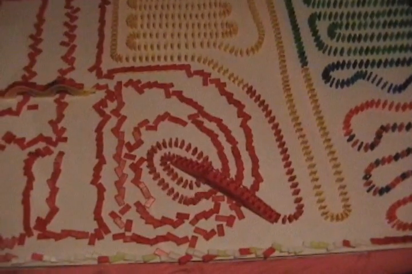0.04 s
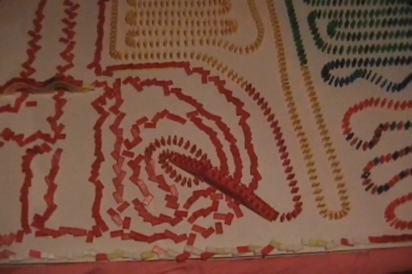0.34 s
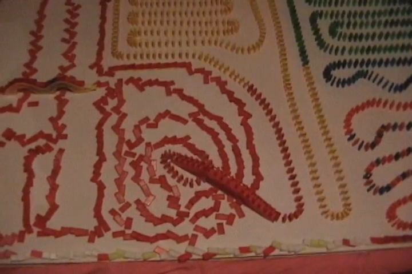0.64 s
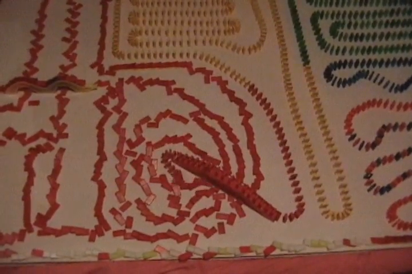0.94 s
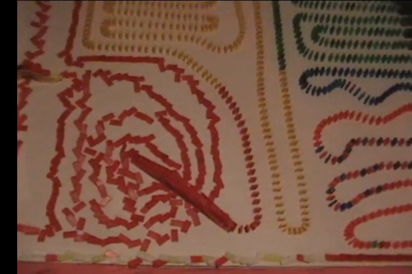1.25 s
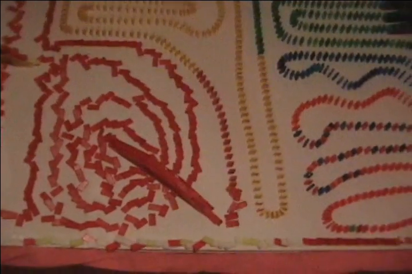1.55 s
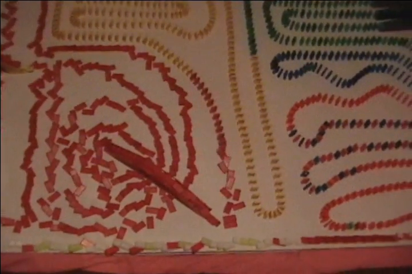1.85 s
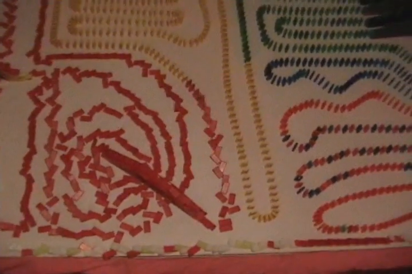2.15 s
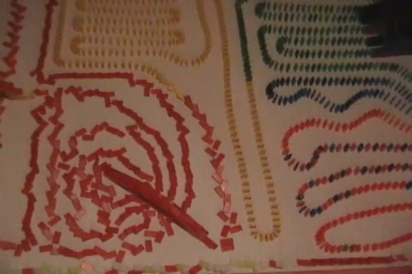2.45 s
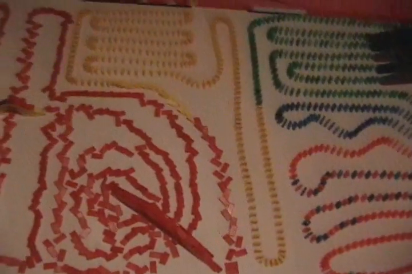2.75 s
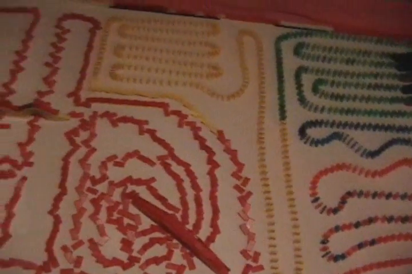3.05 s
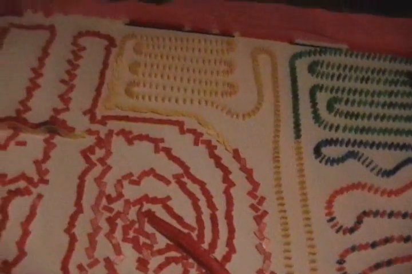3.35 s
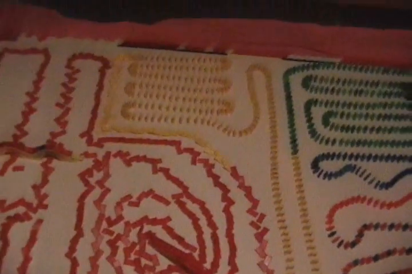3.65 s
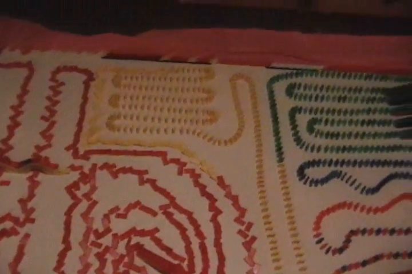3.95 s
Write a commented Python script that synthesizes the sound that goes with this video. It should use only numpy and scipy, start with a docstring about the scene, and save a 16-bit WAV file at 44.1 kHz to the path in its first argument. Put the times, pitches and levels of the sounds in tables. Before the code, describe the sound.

A chain of falling dominoes clicks and rattles without a break, heard from just above the board indoors. Partway through comes one short metallic ring, and afterwards the tiles sound a little duller and softer.

```python
"""Chains of small hard dominoes topple across a board, the microphone just above them in a room.
Each tile hits the next, chatters and rings briefly; lighter contacts of settling tiles fill the gaps
and the board rumbles. Once something metallic is struck and rings on; later the chain runs into
lower-pitched tiles and gets quieter. The image is nearly mono, with low room noise and a faint hum."""
import sys
import numpy as np
from scipy import signal
from scipy.fft import rfft, irfft, next_fast_len
from scipy.io import wavfile

SR = 44100
rng = np.random.default_rng(int(sys.argv[2]) if len(sys.argv) > 2 else 0)


def wav_out(sig):
    """Save sig, one row per channel (or a flat mono array), as 16-bit PCM at SR to the path in sys.argv[1]."""
    wavfile.write(sys.argv[1], SR, np.round(np.clip(np.atleast_2d(sig).T, -1, 1) * 32767).astype(np.int16))


N = 176400

# Clear clacks at the front of the chain. Each row: start in seconds, relative level in dB,
# then trims in dB for the knock, the main ring and the overtones.
CLACKS = [(.0044,-13.5,-21,-5,-12.5),(.0433,-26,-25,-1,-19),(.0717,-7,-34,-17,-16),(.0974,-10,-33,-24,-15),(.1231,-20,-30,1,-5.5),(.1514,-6.5,-37,-31,-20),(.1956,-5.5,-24,-15,-22),
          (.2205,-8.5,-25,-7.5,-13.5),(.2553,-10,-26,-8,-14),(.281,-6.5,-28,-13,-21),(.3096,-6,-32,-16,-16),(.337,-11,-31,-12,-22),(.346,-3.5,-19,-25,-19),(.377,-12.5,-30,-1,-16),
          (.395,-8.5,-37,-11,-24),(.4291,-7.5,-23,-15,-17.5),(.46,-7.5,-20,-12,-19),(.4944,-9.5,-22,-10.5,-16),(.5426,-11.5,-26,-10.5,-24),(.5796,-15,-33,-22,-5.5),
          (.6415,-10.5,-13.5,-36,-10.5),(.6544,-8.5,-19,-21,-35),(.682,-9,-11,-8.5,-17),(.71,-11.5,-30,-10,-18),(.7366,-19,-23,-1.5,-22),(.825,-14,-13,-6.5,-20),(.835,-15,-0.5,-16,-20),
          (.8595,-5,-26,-12.5,-22.5),(.8811,-19,-17,-5,-17),(.9149,-10.5,-20,-22,-28),(.9593,-10,-11,-15,-17),(.9935,-8,-10.5,-11,-17),(1.027,-16.5,-2,-8,-15),(1.0579,-12.5,-4.5,-10,-12.5),
          (1.1015,-14,-8,-12,-19),(1.1216,-16.5,0,-18,-10),(1.1942,-17,-6,-8,-6.5),(1.206,-12.5,-1.5,-6,-22),(1.264,-13.5,-6.5,-29,-16),(1.282,-8,-11,-34,-17),(1.3088,-11,-7.5,-12,-23),
          (1.3188,-14,-11,-21,-17),(1.462,-9,-6.5,-13,-31),(1.545,-12,-18,-12,-20),(1.5518,-6.5,-17,-10.5,-24),(1.5885,-13,-11,-8,-14),(1.5986,-15.5,-7,-7,-18),(1.6144,-8.5,-12,-10.5,-13),
          (1.6625,-20,-0.5,-9,-25),(1.6761,-17,-3.5,-2.5,-13),(1.703,-12.5,-22,-16,-29),(1.741,-8.5,-30,-21,-18.5),(1.7883,-11,-12.5,-11,-8.5),(1.8266,-9.5,-26,-8,-22),(1.8649,-10,-20,-11,-14),
          (1.8992,-9,-30,-28,-18),(1.9356,-7.5,-16.5,-30,-14.5),(1.9698,-12.5,-27,-10,-18),(2.0059,-13,-33,-5.5,-12.5),(2.047,-9,-31,-11,-12),(2.091,-9,-13.5,-14,-15.5),(2.1265,-13,-27,-5,-10.5),
          (2.1615,-13,-27,-10,-17),(2.1929,-12,-9,-27,-14.5),(2.2281,-8,-13,-14,-18.5),(2.2572,-9.5,-11.5,-5.5,-17),(2.319,-13,-23,-30,-28),(2.348,-13.5,-23,-26,-8.5),(2.4158,-15.5,-16,-15,-14),
          (2.4469,-13.5,-14,-30,-22),(2.4792,-9,-19,-29,-20),(2.518,-18,-24,-33,-11),(2.541,-14,-25,-24,-27),(2.7082,-21.5,-2.5,-26,-20),(2.8555,-18.5,-29,-8.5,-10),(2.9426,-11,-17,-27,-16),
          (3.066,-8.5,-15,-21,-15.5),(3.0874,-16,-11,-16,-21),(3.1308,-19.5,-26,-17,-11),(3.3543,-11,-7.5,-30,-28),(3.3913,-15.5,-20,-2,-29),
          (3.425,-15.5,-21,-10,-11.5),(3.462,-10.5,-13,-10.5,-19),(3.4864,-14,-24,-6,-14.5),(3.5193,-13,-25,-31,-18),(3.5405,-12.5,-29,-28,-16),(3.6338,-13.5,-32,-32,-37),(3.684,-17.5,-25,-16,-13),
          (3.6907,-17,-28,-28,-7),(3.71,-10.5,-31,-33,-24),(3.7784,-17.5,-2,-27,-28),(3.7983,-16,-8,-13,-14),(3.8871,-15,-23,-16,-20),(3.9289,-12,-27,-20,-20)]
# Modes of the two kinds of tile, the board and the metal.
# Each row: frequency in Hz, relative level in dB, seconds to fall 60 dB.
HIGH_TILE_MODES = [(1334,-9,0.064),(4600,-16,0.057),(4737,3.5,0.029),(5070,-1.5,0.17),(5230,11,0.089),(5570,-24,0.022),(6410,-32,0.037),(6940,9.5,0.069),(7520,20.5,0.078),(8960,21,0.0082),(9920,17,0.013),(10790,17,0.021),(12500,-12,0.013)]
LOW_TILE_MODES = [(4130,3,0.08),(4432,14,0.024),(4694,13,0.058),(5164,4,0.042),(6300,-4,0.013),(6780,-4,0.058),(7140,-18,0.11),(8002,18.5,0.0047),(8670,5,0.015),(9400,11,0.013),(10360,-17,0.04)]
BOARD_MODES = [(114.5,-12,0.092),(180,18.5,0.077),(198.4,-1,0.82),(241,21,0.055),(330,-9,.07)]
METAL_MODES = [(1373,-12,.2),(1567,3,.4),(1690,0,.1),(2315,-3,.2),(2449,-7,.2),(2649,-5,.12),(2735,-5,.15),(3483,-12,.22),(5753,-4,.35),(8915,11,.14),(9157,2,.14),(10300,-1,.12),(12800,-5,.2)]
# Low tiles along the chain. Each row: time in seconds, share from 0 to 1.
LOW_TILE_SHARE = [(0,0.01),(1.7,0.03),(2.27,0.2),(2.33,0.9),(3.3,0.95),(3.39,0.3),(4,0.4)]
# Spectra of the contact noises and the room noise. Each row: frequency in Hz, gain in dB.
KNOCK_SPECTRUM = [(30,-24),(100,-12),(220,0),(320,0.5),(550,-3),(830,-4),(1080,-6.5),(1350,3.5),(1900,-1.5),(2700,5),(3600,6.5),(4500,7),(7000,-7),(14000,-50)]
CRACK_SPECTRUM = [(100,-9),(2000,-7.5),(3700,-42.5),(4700,6),(6000,12.5),(8000,8),(10500,-27),(12000,-3),(14000,-1.5)]
SNAP_SPECTRUM = [(300,-13),(3000,-6),(7000,-4),(9000,9),(10500,-9),(13000,-7.5)]
RATTLE_SPECTRUM = [(200,-10),(1000,-1.5),(1500,9.5),(3000,1.5),(6000,3),(9000,11),(13000,-1)]
ROOM_SPECTRUM = [(20,-6),(45,-17),(80,3),(130,5.5),(250,1.5),(450,2),(900,-0.5),(4000,-32.5),(14000,-66)]
# Strength of the settling tiles, and of their main ring. Each row: time in seconds, relative level in dB.
SETTLING_LEVEL = [(0,-20.5),(.4,-23.5),(.6,-21.5),(.8,-25),(.9,-20),(1.05,-28.5),(1.17,-24.5),(1.22,-22.5),(1.3,-21),(1.45,-21),(1.61,-23.5),(1.65,-49),(1.73,-25),(1.8,-23),(2.22,-24),(2.31,-25.5),(2.5,-23),(2.6,-25),(2.9,-25.5),(3.0,-30),(3.08,-23.5),(3.25,-24),(3.5,-31),(3.6,-28.5),(3.72,-25),(3.85,-24),(4,-25)]
SETTLING_RING = [(.75,1.5),(1.05,-6.5),(1.45,-3),(1.6,-0.5),(2.25,-0.5),(2.6,-1.5),(3.5,-0.5)]
# Hum in the room. Each row: frequency in Hz, level in dB.
HUM_TONES = [(118,-64),(198,-59)]
# Tiles that ring free, and tiles that land flat. Each row: start in seconds, pitch in Hz, level in dB.
CLINKS = [(.2813,4820,-20),(.377,4750,-26),(.4304,4730,-15),(.4315,6960,-16),(.494,9880,-18),(.9772,4530,-15.5),(1.1877,4530,-16.5),(1.3088,4940,-16),(1.4631,4487,-21),
          (1.7514,4750,-16.5),(1.8657,4680,-10.5),(1.935,4585,-14),(2.0482,4760,-14),(2.1271,4806,-17),(2.1615,4770,-17),(2.1934,4530,-17),(2.4169,4970,-18),(2.448,4680,-17),
          (2.4798,4680,-21),(2.675,4700,-26),(2.7082,4730,-19),(2.745,4700,-22),(2.9426,4170,-22),(3.1308,4950,-21.5),(3.245,4680,-27)]
LANDINGS = [(.283,930,-32),(.43,840,-28.5),(1.865,800,-28.5),(2.349,1054,-32.5),(3.067,933,-34.5)]
# Edge-on-edge contacts. Each row: start in seconds, relative level in dB.
SNAPS = [(0.3969,-22),(1.028,-22),(1.102,-17.5),(1.621,-29),(2.35,-18.5),(2.737,-22.5),(2.796,-28),(2.996,-25.5),(3.357,-22)]
# Width of the room sound. Each row: frequency in Hz, gain of the side channel in dB.
ROOM_WIDTH = [(30,-6),(100,-8),(250,-8),(500,-6.5),(1200,-6),(2200,-16),(4500,-16),(8000,-16),(13000,-19)]
# The chain moving under the microphone. Each row: time in seconds, left minus right in dB.
BALANCE = [(0,1.2),(1.2,.7),(2.8,.4),(3.25,1.5),(3.8,.8)]


def amp(db):
    """Decibels to gain."""
    return 10 ** (np.asarray(db) / 20)


def unit_energy(x):
    """Scale a short sound to the energy of 10 ms at level 1."""
    return x * np.sqrt(.01 * SR / (np.sum(x ** 2) + 1e-12))


def at_level(x, db):
    """Scale to an rms level."""
    return x * amp(db) / np.std(x)


def curve(table, at):
    """Read a two-column table along straight lines."""
    return np.interp(at, *np.array(table, float).T)


def colour(x, table):
    """Minimum-phase filter through (Hz, dB) points, so nothing sounds ahead of a hit."""
    size = next_fast_len(len(x) + 512)
    size += size % 2
    hz, db = np.array(table, float).T
    bin_hz = np.arange(size // 2 + 1) * SR / size
    gain = amp(np.interp(np.log(bin_hz + 1), np.log(hz), db))
    cepstrum = irfft(np.log(gain))
    cepstrum[1:size // 2] *= 2
    cepstrum[size // 2 + 1:] = 0
    return irfft(rfft(x, size) * np.exp(rfft(cepstrum)))[:len(x)]


def ring(modes, size):
    """One decaying sine for each (Hz, dB, t60 in seconds) row."""
    hz, db, t60 = np.array(modes, float).T[:, :, None]
    t = np.arange(size) / SR
    return amp(db) * np.sin(2 * np.pi * hz * t) * np.exp(-np.log(1000) * t / t60)


def burst(decay_s, size):
    """Noise that dies away."""
    return rng.standard_normal(size) * np.exp(-np.arange(size) / SR / decay_s)


def rise(rise_s, size):
    """A soft onset from 0 towards 1."""
    return 1 - np.exp(-np.arange(size) / SR / rise_s)


def add(out, at_s, x):
    """Mix a sound in at a time."""
    i = int(np.clip(at_s * SR, 0, N))
    out[i:i + len(x)] += x[:N - i]


def tile_rings(tile_modes, size, strike_spread_db=5):
    """A struck tile rings in four groups of modes: low ring, main ring, upper ring, overtones."""
    hz, db, t60 = np.array(tile_modes, float).T
    detune, strike = rng.standard_normal((2, len(hz)))
    group = np.searchsorted([4950, 5450, 8000], hz)  # group edges in Hz
    # low ring and overtones shift most in pitch with how the tile is held
    shift = np.array([.025, .006, .006, .015]) * rng.standard_normal(4)
    pitch = hz * (1 + shift[group] + .007 * detune)
    group[hz < 2000] = 1  # the body mode sounds with the main ring
    strike[group == 1] = 0  # every blow excites these alike
    modes = ring(np.column_stack([pitch, db + strike_spread_db * strike, t60]), size)
    return [modes[group == k].sum(0) for k in range(4)]


def chatter(contact, length_s, rebounds=5):
    """The tile touches, then bounces: each part of the contact repeats at quick, uneven intervals."""
    parts = .68 * contact  # first touch
    for k, (jitter, force) in enumerate(rng.random((rebounds, 2))):
        progress = (k + jitter) / rebounds
        lag = 1 + int(min(progress * length_s * SR, contact.shape[1] / 2))
        strength = .9 * (.5 + force) * (1 - progress / 2)
        parts[:, lag:] += strength * contact[:, :-lag]
    return parts


def clacks(rows, gain_db, size=2400):
    """Tile meets tile: a crack, a dull knock, and modes struck again by a few quick rebounds."""
    rings, knocks, cracks = np.zeros((3, N))
    for at, db, knock_db, main_db, overtone_db in rows:
        low_share = curve(LOW_TILE_SHARE, at)
        tile = tile_rings(LOW_TILE_MODES if rng.random() < low_share else HIGH_TILE_MODES, size)
        chatter_s = .0075 * np.exp(.35 * rng.standard_normal())
        contact = np.array(tile + [burst(decay_s=.00052, size=size), burst(decay_s=.0089, size=size)])
        parts = [unit_energy(part) * amp(db + gain_db) for part in chatter(contact, chatter_s)]
        low, main, upper, overtones, crack, knock = parts
        add(rings, at, low * amp(6 * low_share - 5) + main * amp(main_db + 14.5))
        add(rings, at, upper * amp(-2.5) + overtones * amp(overtone_db + 15.5))
        add(cracks, at, crack * amp(-3))
        add(knocks, at, knock * amp(knock_db + 9))
    bass_cut = signal.butter(2, 900, "high", fs=SR, output="sos")  # tiles too small to radiate bass
    rings = signal.sosfilt(bass_cut, rings)
    return rings + colour(cracks, CRACK_SPECTRUM) + colour(knocks, KNOCK_SPECTRUM)


def settling(per_second=150, spread_db=2.3):
    """Light contacts of leaning tiles behind the front of the chain."""
    count = int(per_second * N / SR)
    jitter, force = rng.random(count), rng.standard_normal(count)
    at = (np.arange(count) + 2 * jitter - 1) / per_second
    db = curve(SETTLING_LEVEL, at) + spread_db * force
    low_share = curve(LOW_TILE_SHARE, at)
    knock_db = -10.5 - 4 * low_share
    main_db = -10.5 - 8 * low_share + curve(SETTLING_RING, at)
    overtone_db = -19 + 3 * low_share
    return clacks(np.column_stack([at, db, knock_db, main_db, overtone_db]), gain_db=-12.5)


def board_rumble(blows):
    """The blows drum faintly on the board and set its low modes ringing."""
    push = np.abs(blows) * rng.standard_normal(N)
    response = ring(BOARD_MODES, SR // 2).sum(0)
    return at_level(signal.fftconvolve(push, response)[:N], db=-58.5)


def reflections(x, t60_s=.42, build_s=.0024, db=-4.5, size=SR // 2):
    """The short tail the room sends back to the microphone."""
    tail = burst(t60_s / np.log(1000), size) * rise(build_s, size)
    return signal.fftconvolve(x, amp(db) * tail / np.linalg.norm(tail))[:N]


def room_noise():
    """Low steady noise behind the tiles."""
    return at_level(colour(rng.standard_normal(N), ROOM_SPECTRUM), db=-50.5)


def hum(wander_hz=5.2, turns=60):
    """Two faint low tones in the room that waver in pitch."""
    out = np.zeros(N)
    for hz, db in HUM_TONES:
        wander = np.interp(np.arange(N), np.linspace(0, N, turns), rng.standard_normal(turns))
        phase = 2 * np.pi * np.cumsum(hz + wander_hz * wander) / SR
        out += at_level(np.sin(phase), db)
    return out


def clinks(t60_s=.085, rise_s=.0015, size=SR // 5):
    """A loose tile rings at its own pitch on a close pair of modes."""
    out = np.zeros(N)
    for at, hz, db in CLINKS:
        partner_hz = hz * (1 + .015 * rng.standard_normal())
        pair = ring([(hz, db, t60_s), (partner_hz, db - 10, t60_s)], size).sum(0)
        add(out, at, pair * rise(rise_s, size))
    return out


def landings(t60_s=.055):
    """Tiles land flat on the board with a soft hollow knock."""
    out = np.zeros(N)
    for at, hz, db in LANDINGS:
        add(out, at, ring([(hz, db, t60_s)], size=4000)[0])
    return out


def snaps():
    """Edge hits edge with no rebound: short, dry and bright."""
    out = np.zeros(N)
    for at, db in SNAPS:
        add(out, at, amp(db) * unit_energy(burst(decay_s=.0012, size=600)))
    return colour(out, SNAP_SPECTRUM)


def metal_strike(at_s=1.362, rise_s=.004, rattle_s=.036):
    """Something metallic is struck, rattles for a moment and rings on."""
    out = np.zeros(N)
    add(out, at_s, amp(-24) * rise(rise_s, SR) * ring(METAL_MODES, SR).sum(0))
    t = np.arange(SR // 4) / SR
    rattle = rng.standard_normal(len(t)) / (1 + (t / rattle_s) ** 4)
    add(out, at_s, amp(-23.5) * colour(rattle, RATTLE_SPECTRUM))
    return out


def scene():
    """From just above the board: tiles and metal near the centre, a little width from the room."""
    blows = clacks(CLACKS, gain_db=-16.3) + clinks() + snaps() + landings() + metal_strike() + settling()
    direct = blows + board_rumble(blows)
    mid = direct + reflections(direct) + room_noise() + hum()
    side = colour(reflections(direct) + amp(-3) * room_noise(), ROOM_WIDTH)
    balance_db = curve(BALANCE, np.arange(N) / SR)
    return np.array([(mid + side) * amp(balance_db / 2), (mid - side) * amp(-balance_db / 2)])


def record(dry, top_hz=13050):
    """The recorder cuts the top steeply."""
    return signal.sosfilt(signal.ellip(12, .2, 80, top_hz, fs=SR, output="sos"), dry)


dry = scene()
out = record(dry)
wav_out(out)
```